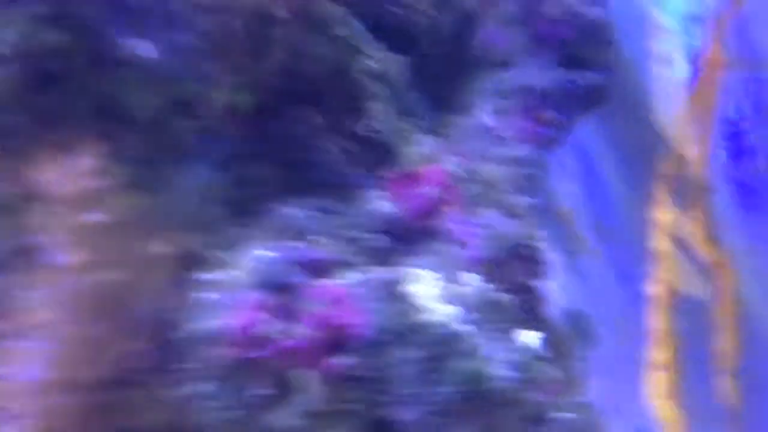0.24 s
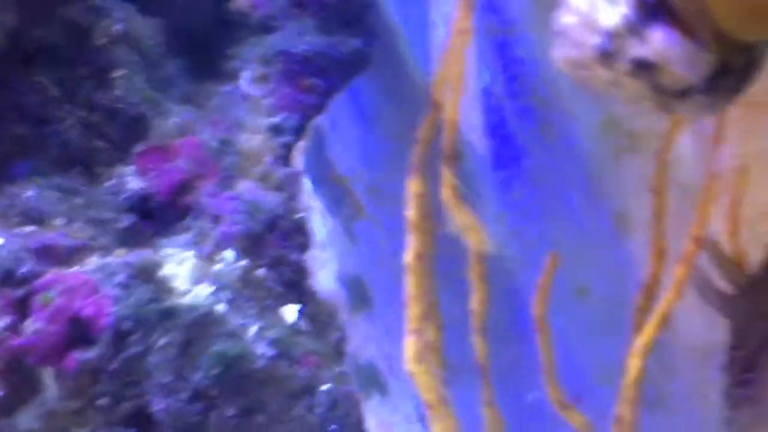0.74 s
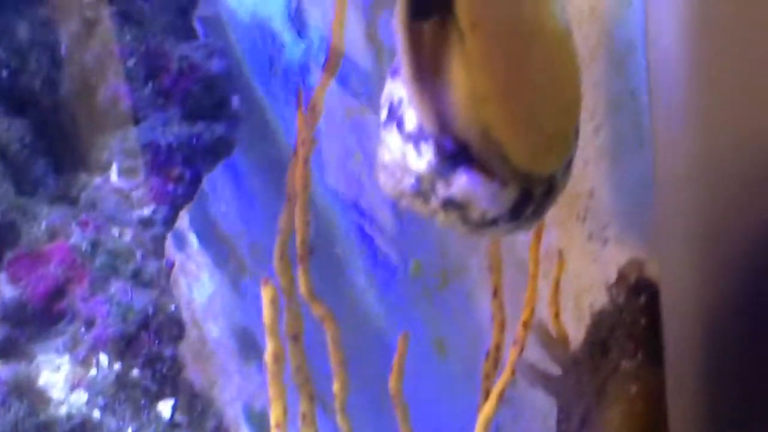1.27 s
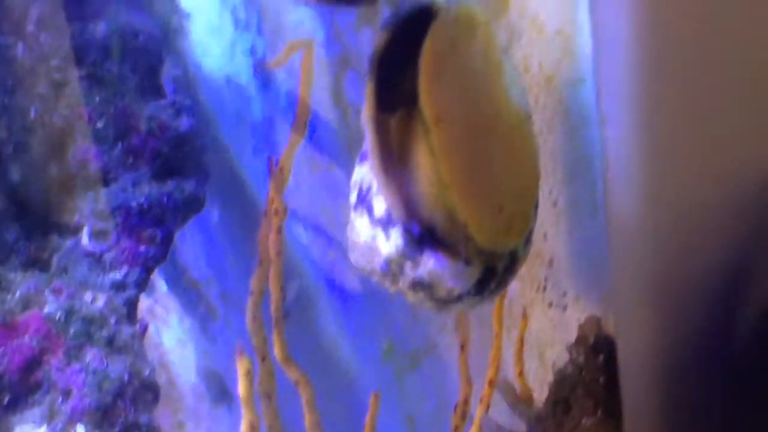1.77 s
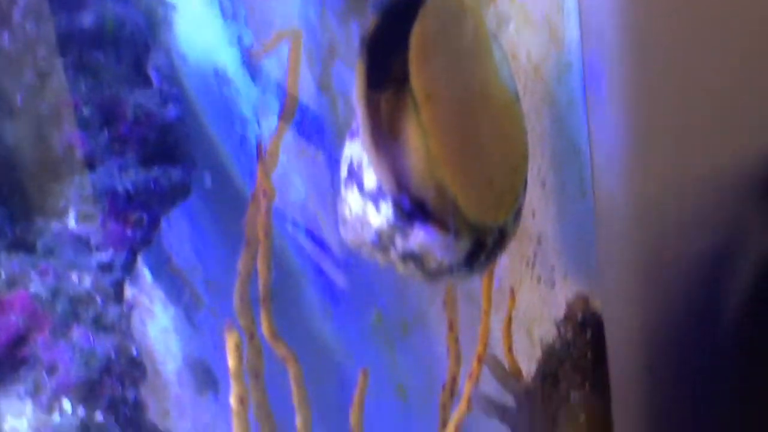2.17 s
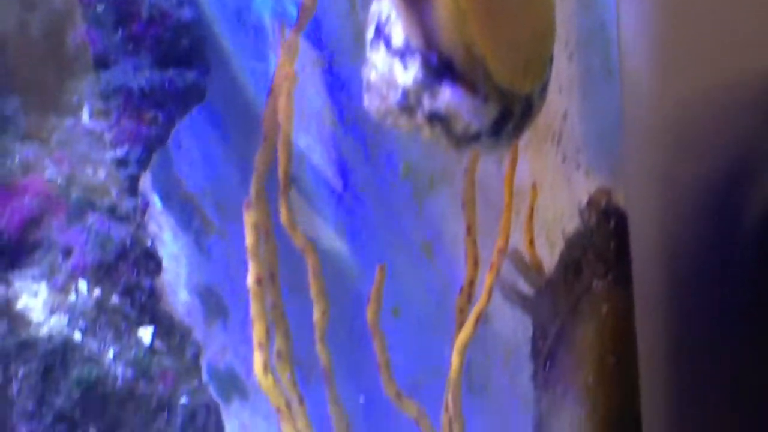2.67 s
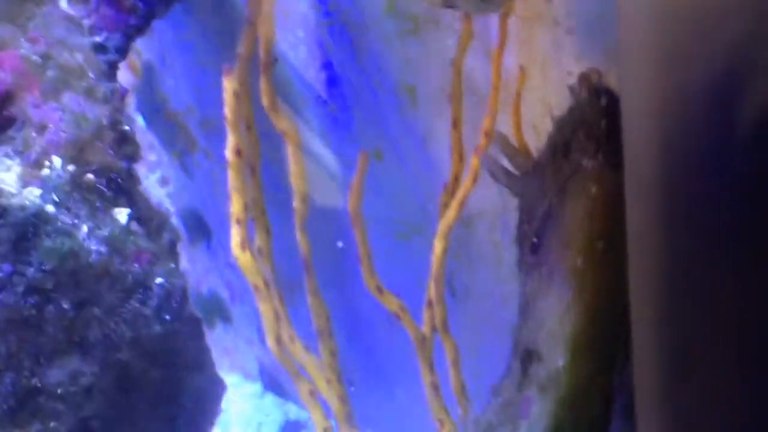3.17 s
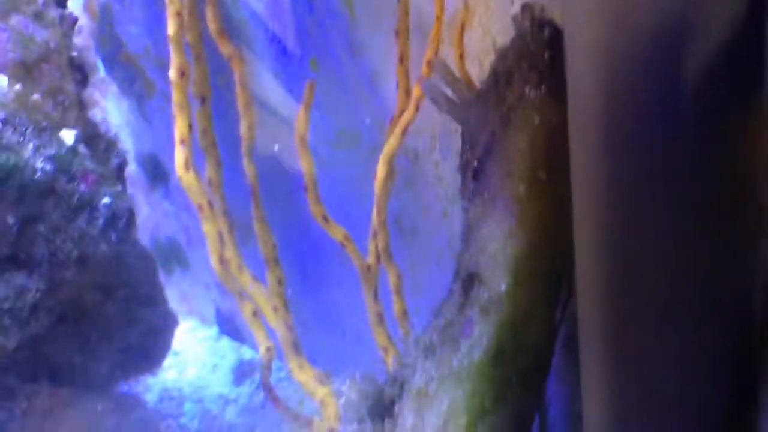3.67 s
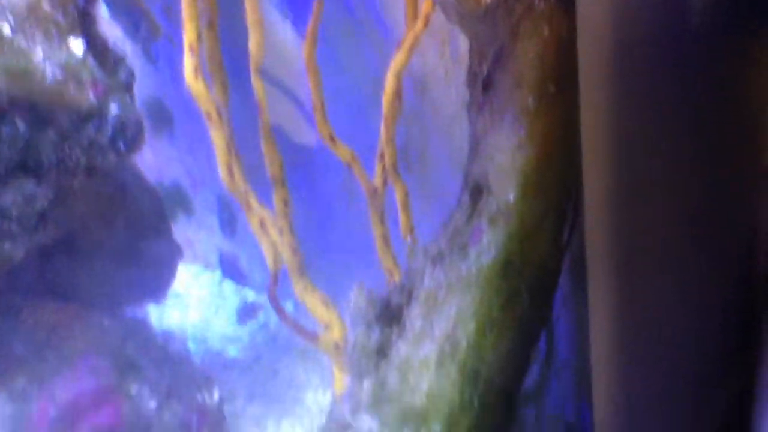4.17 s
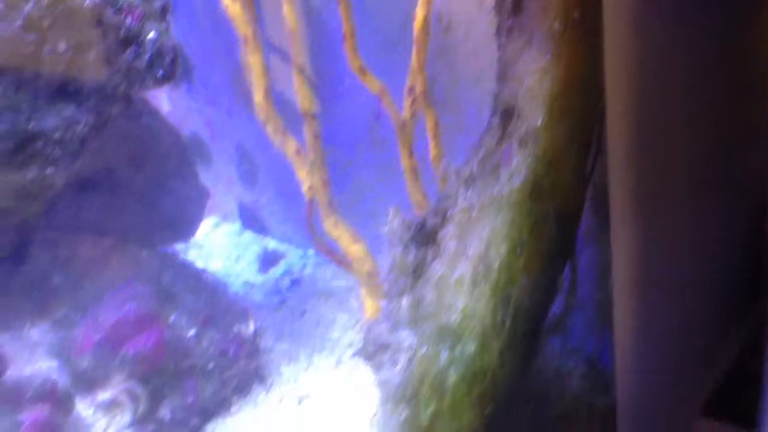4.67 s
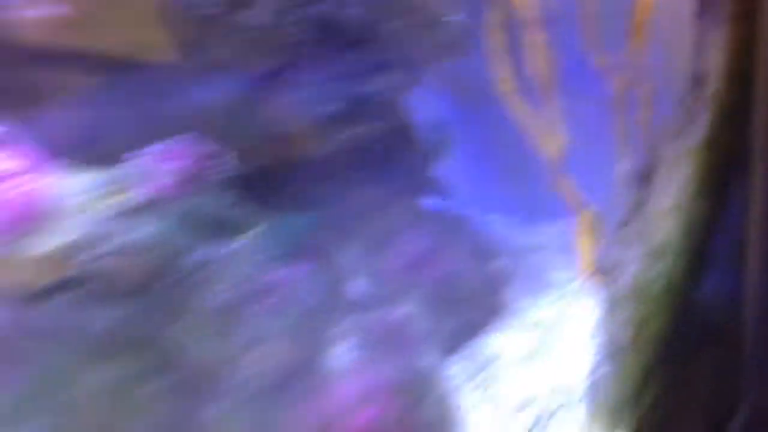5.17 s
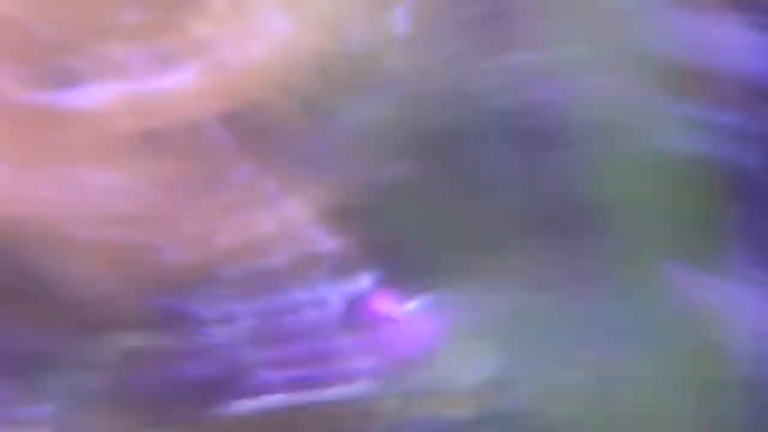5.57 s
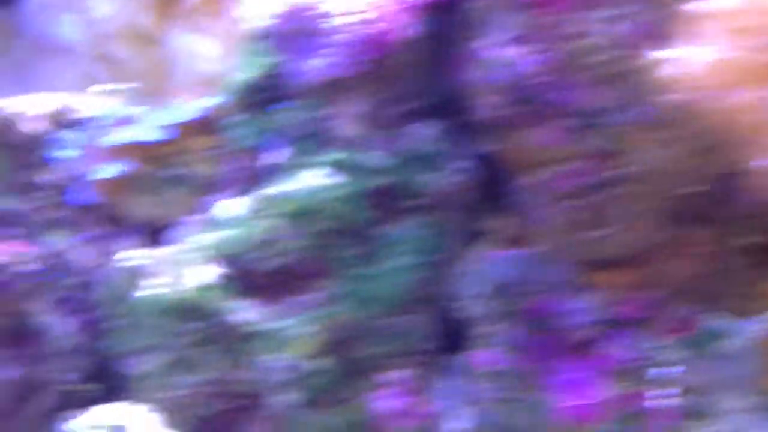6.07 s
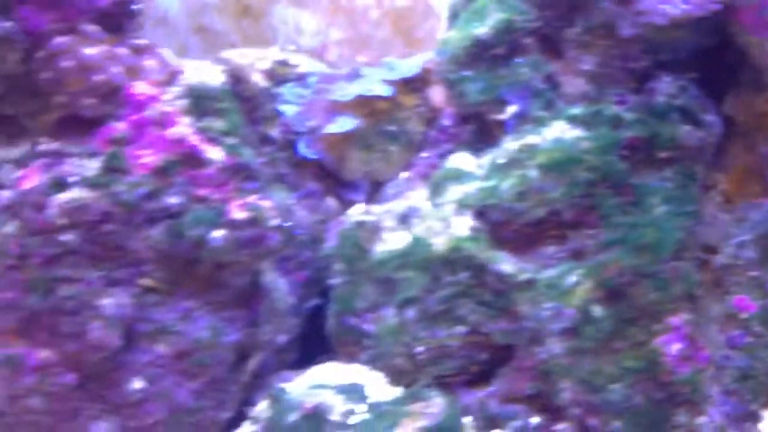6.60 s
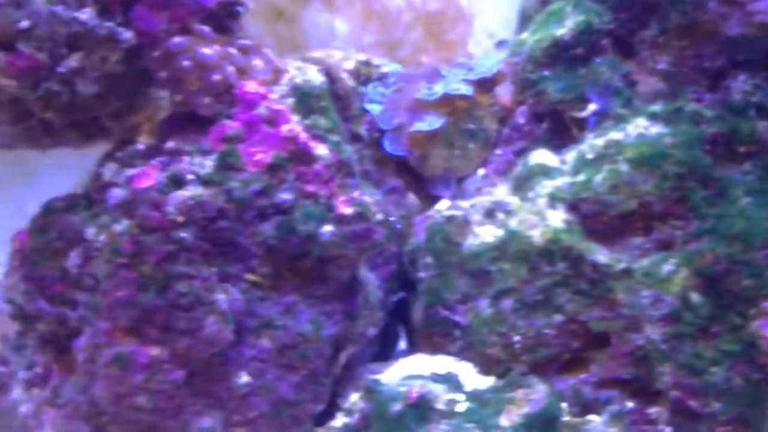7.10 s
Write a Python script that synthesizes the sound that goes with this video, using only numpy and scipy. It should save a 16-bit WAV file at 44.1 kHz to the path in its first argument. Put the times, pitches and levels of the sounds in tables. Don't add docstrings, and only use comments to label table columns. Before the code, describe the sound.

A steady low electrical pump hum with a thin whine and soft water wash, scattered drips ticking, then the hum fades as the camera turns away.

```python
import sys
import numpy as np
from scipy import signal
from scipy.fft import rfft, irfft
from scipy.io import wavfile
from scipy.ndimage import uniform_filter1d

SR = 44100
rng = np.random.default_rng(int(sys.argv[2]) if len(sys.argv) > 2 else 0)


def elevation(decibels):
    levels = np.asarray(decibels, float)
    return 10 ** (levels / 20)


def bounce(signal):
    frames = np.transpose(np.atleast_2d(signal))
    limited = np.clip(frames, -1, 1)
    pcm = np.round(limited * 32767).astype(np.int16)
    wavfile.write(sys.argv[1], SR, pcm)


N = 323811
MAINS_HZ = 59.965


def evened(x):
    return x / np.sqrt(np.mean(x ** 2) + 1e-20)


def follow(rows, t):
    return np.interp(t, *np.transpose(rows))


def between(near_db, far_db, away):
    return near_db + (far_db - near_db) * away


def hump(x, centre, width, db):
    return db * np.exp(-0.5 * ((x - centre) / width) ** 2)


def wander(rate_hz):
    knots = rng.standard_normal(400)
    return np.interp(np.arange(N) / SR * rate_hz, np.arange(400), knots)


def add(mix, s, sound):
    part = mix[round(s * SR):][:len(sound)]
    part += sound[:len(part)]


def band(x, low_hz, high_hz):
    sos = signal.butter(2, [low_hz, min(high_hz, SR / 2.2)], "band", fs=SR, output="sos")
    return signal.sosfilt(sos, x)


def tone(hz, db, shake, phase=None):
    if phase is None:
        phase = 2 * np.pi * rng.random()
    turn = 2 * np.pi * hz * np.arange(N) / SR + phase + shake * wander(5.0)
    return np.sqrt(2) * elevation(db + 3.0 * shake * wander(6.0)) * np.cos(turn)


# t/s, share turned away/0-1
CAMERA_TURN = [
    (0, .0),
    (4.6, 0.07),
    (5.0, 0.06),
    (5.3, 0.21),
    (5.6, 0.46),
    (5.9, 0.58),
    (6.3, 0.77),
    (6.8, 0.98),
    (7.34, 0.92),
]


def turned_away(t):
    return follow(CAMERA_TURN, t)


def stray_hiss():
    frames, hz = N // 1024 + 3, np.fft.rfftfreq(2048, 1 / SR)
    a, b = rng.standard_normal((2, 1025, frames))
    bands = np.searchsorted([4200, 5200, 6300, 7600, 9000, 10600, 12300, 14500], hz)
    struck = rng.random((9, frames)) < 0.018
    struck[[0, 8]] = False
    level_db = -94.5 - 5.0 * np.log2(hz / 6000 + 0.16)
    spectra = (a + 1j * b) * struck[bands] * elevation(level_db)[:, None]
    return signal.istft(spectra, window="cosine", nperseg=2048, noverlap=1024)[1][194:194 + N]


# f/Hz, close/(dB per Hz), away/(dB per Hz)
WASH_SPECTRUM = [(22, -94, -102), (50.7, -87, -110), (75.4, -84, -89.5), (160, -81.5, -89),
                 (343, -90, -91.5), (725, -92.5, -97), (1520, -101, -101), (1680, -104, -104),
                 (3200, -105, -105), (4000, -102, -104), (5000, -106, -108), (6000, -108, -110),
                 (11100, -111, -112), (16000, -115, -116)]
# t/s, level/dB
TRICKLE_LEVEL = [(0, 1), (.4, 3.5), (1.6, 0.4), (3.1, 2), (3.6, 4), (4.2, 1.8), (4.8, 3), (5.8, -0.2),
                 (7.34, 0.4)]


def wash():
    frames, hz = N // 256 + 5, np.fft.rfftfreq(1024, 1 / SR)
    t = np.arange(frames) * 256 / SR
    a, b, patches = rng.standard_normal((3, 513, frames))
    patches_db = evened(uniform_filter1d(uniform_filter1d(patches, 12, 0), 10, 1))

    f, *levels_db = np.transpose(WASH_SPECTRUM)
    near, far = (np.interp(np.log(hz + 1), np.log(f), db, right=db[-1])[:, None] for db in levels_db)
    treble_lift = hump(hz, 14300, 1800, 2.8)[:, None]
    gurgle = hump(hz, 1900, 99, 2.7)[:, None]
    wet = (hz / (hz + 1500) * 6000 / (hz + 6000))[:, None]
    rumble = evened(uniform_filter1d(rng.standard_normal(frames), 14)) * (70 / (hz + 70))[:, None]

    level_db = near + treble_lift + (far - near + gurgle) * turned_away(t)
    level_db = level_db + 4.4 * rumble + patches_db + 1.51 * wet * follow(TRICKLE_LEVEL, t)
    noise = signal.istft((a + 1j * b) * elevation(level_db + 17.0), nperseg=1024, noverlap=768)[1][:N]
    throb = np.cos(4 * np.pi * MAINS_HZ * np.arange(N) / SR)
    return noise + 0.2 * throb * band(noise, 3000, 9000)


def drip(db, hz, width_hz, t60_s, splash_db, noise):
    t = np.arange(len(noise)) / SR
    spray = noise * elevation(-60 * t / np.clip(t60_s, 0.02, 0.5)) * np.minimum(t / 0.00045, 1)
    spray = spray * (1 + 0.13 * np.exp(-t / 0.0014))
    spray[8] += 6.0
    half_hz = np.clip(width_hz, 100, hz) / 2
    ring = band(spray, hz - half_hz, hz + half_hz)
    skirt = band(spray, hz / 2.1, hz * 1.59)
    splash = band(spray, 3900, 12000)
    ring = ring / abs(ring).max() + 0.22 * skirt / abs(skirt).max()
    splash_db = splash_db + 6.4 * np.log2(min(hz, 5000) / 4000)
    return elevation(db) * (ring / abs(ring).max() + elevation(splash_db) * splash / abs(splash).max())


# t/s, peak/dB, f/Hz, t60/s
OVERFLOW_DROPS = [(.566, -52, 4140, .053), (.731, -51, 4020, .16), (.985, -48.5, 4000, 0.18),
                  (.9906, -44.5, 3900, 0.14), (1.02, -47.5, 4030, 0.15), (2.429, -56, 3900, .12),
                  (2.973, -49.5, 4200, 0.071), (3.496, -56, 3730, 0.15), (3.64, -57, 4000, .25),
                  (3.68, -50, 3930, .1), (3.6945, -40.5, 4000, .06), (3.699, -59, 4000, 0.27),
                  (3.763, -62, 3900, .15), (3.839, -58, 3570, 0.11), (4.12, -57, 3640, 0.27),
                  (4.288, -48.5, 3770, 0.26), (4.597, -50, 3820, 0.16), (4.752, -51, 4100, .14),
                  (4.7592, -48.5, 3930, .22), (4.823, -48.5, 4050, 0.13), (4.913, -53.5, 3870, 0.1),
                  (5.207, -52.5, 4000, 0.32), (5.264, -52, 4000, .15), (5.481, -50.5, 4000, .14),
                  (5.7586, -50, 4000, 0.13), (5.775, -54, 3820, .25), (6.109, -54, 4100, 0.27),
                  (6.317, -48, 4050, .1), (6.523, -51.5, 3900, .15), (6.87, -53.5, 3950, .2)]
# t/s, peak/dB, f/Hz, t60/s
TANK_PLOPS = [(.27, -62, 2000, .2), (.3, -56, 780, .32), (.39, -49, 784, 0.34), (.734, -57, 2800, .11),
              (2.009, -60, 930, .1), (2.35, -50, 543, 0.11), (2.426, -62, 2850, 0.1),
              (3.494, -57, 2320, .15), (3.696, -56.5, 2660, 0.22), (4.124, -53.5, 1240, .12),
              (4.289, -57, 3100, 0.23), (5.262, -55.5, 3200, .1), (5.759, -51, 2460, 0.083),
              (6.056, -58, 2230, .12), (6.11, -55, 865, 0.075), (6.317, -54, 3340, .1),
              (6.523, -53, 2930, 0.14), (6.535, -56.5, 2820, .25), (6.524, -58, 2220, .1),
              (6.776, -51, 2040, .05), (7.1447, -57, 2220, .092), (7.155, -54.5, 1950, .15),
              (7.18, -58, 1000, .11), (6.15, -61, 2100, .5), (6.3, -65, 2060, .5), (6.38, -62, 2080, .4)]
# t/s, peak/dB, centre f/Hz,
# t60/s
GLASS_SLOSHES = [(.028, -55.5, 2050, .15), (.1845, -49, 10500, .03), (.578, -38, 2690, 0.035),
                 (.583, -40, 2310, 0.047), (.926, -53.5, 5500, .16), (1.02, -62, 7500, .18),
                 (3.39, -53.5, 2300, .25), (3.499, -55, 8500, 0.18), (3.475, -56, 6000, .3),
                 (3.493, -48.5, 5850, 0.16), (3.531, -62, 3500, .4), (3.64, -61, 7500, .25),
                 (3.66, -58, 7000, .15), (3.696, -54.5, 7000, 0.14), (4.106, -56, 2400, 0.3),
                 (4.255, -54.5, 2280, .25), (4.597, -55, 7960, .09), (4.604, -46.5, 6000, 0.14),
                 (5.212, -61, 7500, .25), (5.218, -52, 1400, 0.17), (5.264, -62, 7000, .15),
                 (5.481, -64, 7500, 0.16), (5.532, -60, 6500, .15), (6.87, -64, 7500, .2),
                 (3.839, -46.5, 1220, 0.12), (4.139, -51, 1200, 0.12), (5.2058, -46.5, 1280, .12),
                 (3.375, -59, 4500, .35)]
# t/s, peak/dB, f/Hz, t60/s
SURFACE_FIZZES = [(.06, -60, 5470, .5), (.23, -60, 5460, .5), (.337, -52, 4810, .12),
                  (.38, -58, 5700, 0.54), (.865, -61, 5880, .15), (1.024, -60, 8940, .12),
                  (1.88, -61, 6500, .1), (3.19, -60, 9600, .15), (3.57, -58, 4450, 0.13),
                  (5.266, -56, 9100, .16), (6.0546, -56.5, 4260, .15), (6.94, -62, 9200, .12),
                  (5.268, -54, 5400, 0.15), (5.05, -65, 4450, 0.54)]


def drips():
    out = np.zeros(N)
    # events, least ring width/Hz, width as share of pitch, splash against ring/dB
    kinds = ((OVERFLOW_DROPS, 185, 0.1, -11), (TANK_PLOPS, 190, 0.04, -20),
             (GLASS_SLOSHES, 170, 0.46, -2.5), (SURFACE_FIZZES, 240, 0.1, -20))
    for events, least_hz, share, splash_db in kinds:
        for s, db, hz, t60_s in events:
            noise, lumps = rng.standard_normal((2, 8000))
            lumpy = noise * elevation(1.5 * evened(uniform_filter1d(lumps, 130)))
            add(out, s, drip(db, hz, least_hz + share * hz, t60_s, splash_db, lumpy))
    return out


# t/s, peak/dB, crack against ring/dB
FINGER_TAPS = [
    (.184, -42.5, -4),
    (0.577, -33, -1.5),
    (.5825, -34.5, -20),
]
# f/Hz, level/dB, t60/s
BODY_MODES = [(190, 1, 0.029), (520, 10, 0.014), (784, 7.5, 0.033), (1200, 2, 0.019), (1440, 0, 0.029),
              (1840, -12, 0.026), (2230, -10, 0.051), (2910, -3, 0.027), (6350, -22, .012)]


def taps():
    out, t = np.zeros(N), np.arange(3000) / SR
    for s, db, crack_db in FINGER_TAPS:
        ring = np.zeros(len(t))
        for hz, mode_db, t60_s in BODY_MODES:
            decay = elevation(mode_db - 60 * t / min(t60_s, 0.06))
            ring += decay * np.sin(2 * np.pi * hz * t + 3 * rng.random())
        ring = ring * np.minimum(t / 0.0015, 1)
        crack = band(rng.standard_normal(3000), 400, 10500) * (t / 0.0011) * np.exp(-t / 0.0014)
        add(out, s, elevation(db) * (ring / abs(ring).max() + elevation(crack_db) * crack))
    return out


# t/s, level/dB, start f/Hz, end f/Hz, length/s
GRIP_THUDS = [
    (0.57, -71, 110, 60, .1),
    (5.262, -56, 106, 60, 0.1),
    (5.35, -57, 40, 68, 0.07),
    (5.623, -58, 116, 65, 0.065),
]


def thuds():
    out = np.zeros(N)
    for s, db, start_hz, end_hz, length_s in GRIP_THUDS:
        u = np.arange(0, 1, 1 / (length_s * SR))
        turns = np.cumsum(start_hz + (end_hz - start_hz) * u) / SR
        add(out, s, np.sqrt(2) * elevation(db) * np.sin(np.pi * u) * np.sin(2 * np.pi * turns))
    return out


# t/s, level/dB
WHINE_LEVEL = [(0, -63.5), (.61, -63), (1.86, -61.5), (2.86, -63.5), (3.17, -65.5), (4.05, -69), (4.2, -71),
               (4.78, -73), (4.86, -80), (5.07, -70), (5.5, -75.5), (5.72, -69), (6.13, -67), (6.29, -68.5),
               (6.54, -74), (6.75, -71), (7.34, -70.5)]


def whine(t):
    whine_hz, level_db = 1477.42, follow(WHINE_LEVEL, t)
    return tone(whine_hz, level_db, shake=0.11) + tone(2 * whine_hz, level_db - 35.5, shake=0.33)


def whistle(away):
    return tone(4432.6, between(-81, -95, away), shake=0.22)


# close/dB, away/dB
FAN_ORDERS = [(-82.5, -84), (-76, -84.5), (-71.5, -77.5)]


def fan(away):
    out, shaft_hz = np.zeros(N), 43.6
    for octave, (near_db, far_db) in enumerate(FAN_ORDERS):
        out += tone(2 ** octave * shaft_hz, between(near_db, far_db, away), shake=0.64)
    return out


def lag(k):
    if k > 4:
        return 1.6 * k + 2.0 + 0.05 * (k - 10) ** 2
    return -2.0 + 1.8 * (k % 2)


# t/s, level/dB
PULL_LEVEL = [(0, -52.5), (.5, -52.5), (1.0, -52.5), (2.4, -52.5), (3.6, -51), (4.6, -51.5), (5.1, -53.5),
              (5.55, -57), (5.95, -62.5), (7.34, -63)]
# t/s, spread/s, level/dB
GRIP_DIPS = [
    (.635, 0.04, -14),
    (5.3, .015, -13),
    (5.4, 0.022, -16),
    (5.665, 0.017, -7),
    (5.78, 0.036, -10),
    (6.58, 0.033, -6),
    (7.07, .03, -1),
]


def pull(t, away):
    dips_db = sum(hump(t, *grip) for grip in GRIP_DIPS)
    waver_db = between(0.5, -0.5, away) * wander(18.0)
    level_db = follow(PULL_LEVEL, t) + dips_db + waver_db
    return tone(2 * MAINS_HZ, level_db, shake=0.045, phase=lag(1.99))


# multiples of the mains, then close/dB, away/dB for each
CASING_MULTIPLES = [1, 3, 4, 5, 6, 7, 8, 9, 10, 11, 12, 13, 15, 17, 18, 19, 20, 21, 22]
CASING_HUM = [(-64, -82), (-68.5, -71.5), (-53.5, -73), (-76, -73), (-70.5, -67), (-84, -80.5),
              (-89.5, -73.5), (-73, -75.5), (-67, -76.5), (-65, -66.5), (-103, -83), (-71, -76),
              (-89.5, -91), (-81.5, -84.5), (-77, -79), (-71.5, -77), (-76.5, -80), (-80, -99),
              (-87.5, -85.5)]
# multiples of the mains, then close/dB, away/dB for each
WINDING_MULTIPLES = [27, 28, 30, 34, 66, 68, 70, 89, 90, 91, 92, 95, 101, 103]
WINDING_BUZZ = [(-93, -88.5), (-87.5, -85), (-85, -90), (-88, -87.5), (-82.5, -94), (-85, -105),
                (-86.5, -93), (-86.5, -97), (-95, -91), (-89.5, -88), (-91, -92), (-92.5, -88.5),
                (-87.5, -92), (-92.5, -99)]


def pump(t, away):
    out = pull(t, away)
    facing_glass = hump(t, 5.4, 0.45, 0.98)
    arm_shade_db = hump(t, 5.6, 0.24, -2.5)
    for k, (near_db, far_db) in zip(CASING_MULTIPLES + WINDING_MULTIPLES, CASING_HUM + WINDING_BUZZ):
        hz = k * MAINS_HZ
        glass_db = facing_glass * hump(hz, 1150, 79, 5.9)
        level_db = between(near_db, far_db, away) + glass_db + arm_shade_db * (8 < k < 14)
        drift = rng.uniform(-1.72, 2.2) * (away + (k > 13))
        out = out + tone(hz, level_db, shake=0.14 + 0.0022 * k, phase=lag(k) + drift)
    return out


def scene():
    t = np.arange(N) / SR
    away = turned_away(t)
    machine = pump(t, away) + fan(away) + whistle(away)
    mono = wash() + drips() + taps() + thuds() + whine(t) - machine
    return np.array([mono, mono])


def low_pass(x):
    return signal.sosfilt(signal.butter(12, 15990, fs=SR, output="sos"), x)


def record(dry):
    edge_hz = 15330
    spectrum = rfft(dry + np.array([[1], [-1]]) * stray_hiss())
    mix = irfft(spectrum * (np.fft.rfftfreq(N, 1 / SR) < edge_hz), N)
    return low_pass(mix)


dry = scene()
out = record(dry)
bounce(out)
```